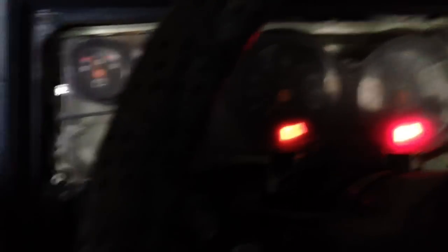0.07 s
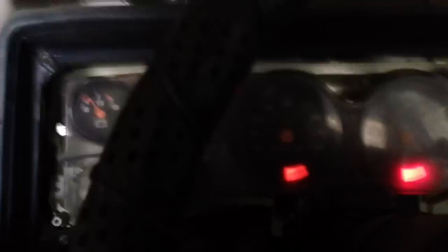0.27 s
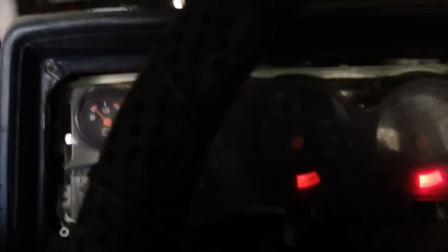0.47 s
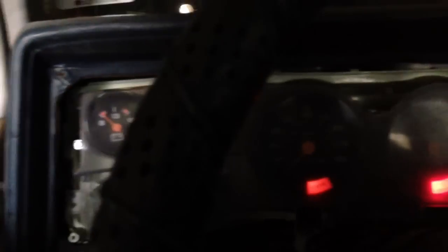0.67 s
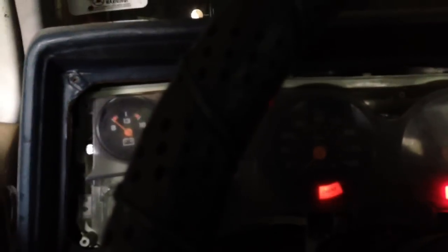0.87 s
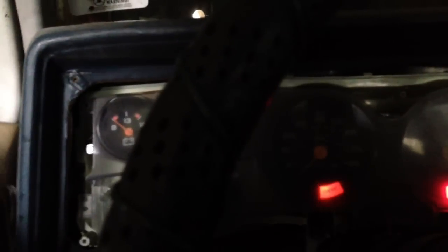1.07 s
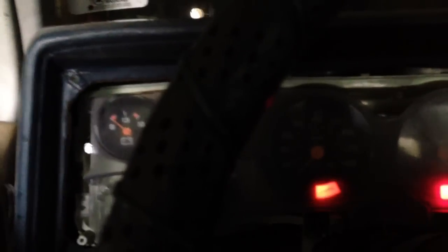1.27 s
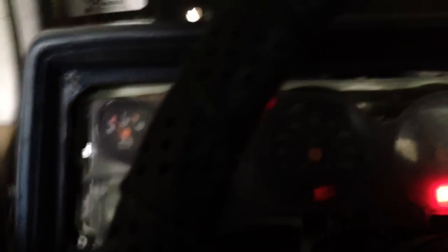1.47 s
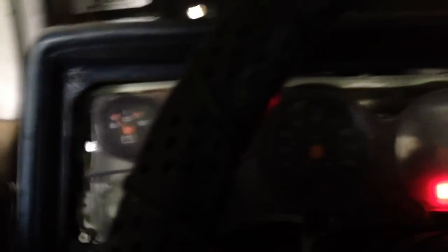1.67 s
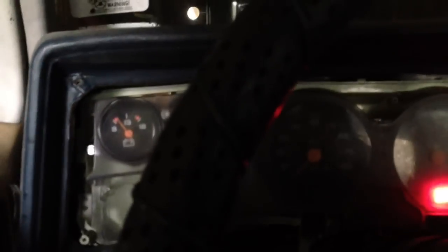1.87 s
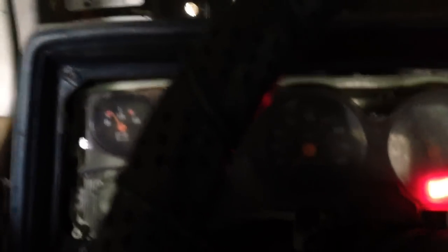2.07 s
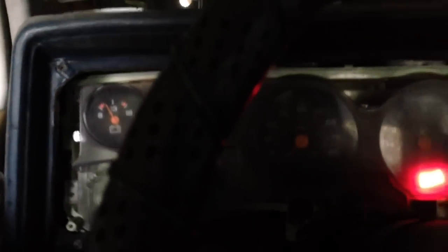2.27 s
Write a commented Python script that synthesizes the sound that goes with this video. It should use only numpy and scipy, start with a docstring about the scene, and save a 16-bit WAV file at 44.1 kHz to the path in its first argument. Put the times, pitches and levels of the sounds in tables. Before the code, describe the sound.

A car starter grinds harshly, heard close from the driver's seat: quick key clicks, over a second of loud metallic gear rasp with a wavering motor growl, then the engine catches, flares with a hoarse belt squeal and fades.

```python
"""The starter motor of a V8 growls and its pinion grinds on the ring gear, heard from the driver's seat.
Teeth clash at random moments and excite the housing; harder bites ring it, and the motor is a wavering tone.
Key clicks come first, a snap and a short ring each. At the end the engine catches, flares and runs down:
firing pulses excite the cabin, with a firing tone, a hiss of intake air and a belt rasp of resonant noise."""
import sys
import numpy as np
from scipy import signal
from scipy.fft import rfft, irfft, next_fast_len
from scipy.io import wavfile
from scipy.ndimage import map_coordinates

SR = 44100
rng = np.random.default_rng(int(sys.argv[2]) if len(sys.argv) > 2 else 0)


def materialize(psi):
    """Save the field psi as 16-bit PCM at rate SR to the path in sys.argv[1].

    A 1-D psi becomes a single channel; in a 2-D psi each row is a channel.
    """
    bounded = np.clip(np.atleast_2d(psi).T, -1, 1)
    quanta = np.round(bounded * 32767).astype(np.int16)
    wavfile.write(sys.argv[1], SR, quanta)


N = 101430

# Steady background noise. Each row: frequency in Hz, level in dB.
FLOOR_SPECTRUM = [(25, -25), (80, -30), (135, 3), (220, -13), (500, -22.5), (3000, -34), (15000, -34)]
FLOOR_DB = -54.5

# Key and switch clicks. Each row: time in seconds, level in dB, level of the snap against the ring in dB.
KEY_CLICKS = [(0.077, -47, -1), (0.098, -32.5, -18), (0.125, -44, 2), (0.1336, -26.5, 4), (0.151, -41, 7)]
# Modes of the lock barrel. Each row: frequency in Hz, width in Hz, level in dB.
LOCK_MODES = [(780, 60, 3.5), (970, 200, -4), (1663, 180, -2), (2120, 470, -6), (4350, 320, -13)]
# Spectrum of the snap. Each row: frequency in Hz, level in dB.
SNAP_SPECTRUM = [(150, -28), (500, -25), (760, 3.5), (2500, -15), (4300, -2), (6500, -14.5), (15000, -14)]
LOCK_T60_S, SNAP_T60_S = 0.075, 0.04  # time to fall by 60 dB
LOCK_DB, SNAP_DB = -3.5, 0.5

# How hard the pinion grinds. Each row: time in seconds, level in dB before the chatter.
GRIND_LEVEL = [(.2, -66), (.214, -40), (.231, -27.5), (.236, -17), (.258, -16.5), (.31, -11), (.345, -13),
               (.41, -13), (.452, -12.5), (.502, -11.5), (.6, -15.5), (.645, -15), (.73, -13), (.815, -18),
               (.888, -12), (.938, -15.5), (.978, -23.5), (.992, -8.5), (1.05, -13.5), (1.07, -18),
               (1.095, -13.5), (1.14, -12.5), (1.175, -17.5), (1.2, -22.5), (1.228, -27.5), (1.26, -23.5),
               (1.304, -29.5), (1.35, -26), (1.361, -12.5), (1.38, -15), (1.434, -22.5), (1.46, -16),
               (1.49, -20), (1.54, -34.5), (1.6, -55)]
# Spectrum of the grinding. Each row: frequency in Hz, level in dB.
GRIND_SPECTRUM = [(59, -36), (118, -32), (173, -9), (313, -9.5), (386, -19), (478, -7), (600, -15),
                  (1460, -9), (1730, -3), (2400, -4.5), (2630, -6.5), (2870, -4), (5750, -6.5),
                  (11300, -22.5), (15500, -34.5)]
# Brightness of the grinding. Each row: time in seconds, treble gain in dB.
GRIND_TREBLE = [(.21, 3.5), (.228, 1.5), (.245, -2.5), (.29, 1), (.35, 0), (.42, -1), (.52, -0.5),
                (.62, -1.5), (.74, 0.5), (.9, 1), (1.02, -2.5), (1.13, -0.5), (1.21, 1), (1.27, 5.5),
                (1.32, -1), (1.37, 3.5), (1.46, 0)]
# Low mids of the grinding. Each row: time in seconds, gain in dB.
GRIND_LOW_MIDS = [(.25, 0), (.41, -9), (.54, -2.5), (.69, -3), (.87, -1), (1.11, -1), (1.24, -0.5)]
# Modes of the starter housing and ring gear. Each row: frequency in Hz, width in Hz, level in dB.
HOUSING_MODES = [(1360, 15, -5), (1739, 35, 3.5), (1913, 30, -5), (2064, 30, 1.5), (2650, 65, -1),
                 (2990, 48, -0.5), (3286, 16, -3), (3790, 16, 5), (4555, 53, -3.5), (4885, 27, 4.5),
                 (5310, 64, -8.5), (5630, 43, 3.5)]
TEETH_PER_S, TOOTH_SCATTER_DB = 900, 3.5  # mean rate of clashes, spread of their strength
SCRAPE_DB, CHATTER_DB = -2.5, 1  # scraping against the clashes, random flicker of the level
SMEAR_S, PATH_S = .0016, .045  # spread of each clash, length of the shifting paths
PATHS_DB, SHIFT_PER_S = -5, 10  # paths against the direct force, knots a second of their change
GRIND_DB, HOUSING_DB = -0.38, -7.5
GRIND_TREBLE_HZ, LOW_MIDS_HZ = 3460, 900

# Starter motor under the changing load. Each row: time in seconds, pitch in Hz, level in dB.
MOTOR_CURVE = [(.22, 230, -51), (.25, 198.6, -35), (.31, 169, -28.5), (.35, 253.7, -40),
               (.41, 219.5, -28.5), (.46, 268, -56), (.53, 250, -28.5), (.57, 175.7, -27.5),
               (.65, 170.8, -29.5), (.685, 182.2, -44), (.735, 205.4, -33), (.76, 213.3, -30.5),
               (.81, 205.9, -38), (.845, 297.7, -47), (.87, 335.3, -24), (.893, 318, -36), (.918, 288, -25),
               (.95, 256, -56), (1.01, 178, -43), (1.06, 202, -67), (1.13, 298, -51), (1.168, 337.4, -33),
               (1.21, 322.7, -44.5), (1.3, 282, -73)]
# Levels of the first harmonics in dB, the fundamental first.
MOTOR_HARMONICS = [0, -43, -14.5]
MOTOR_ROUGH_RAD, MOTOR_FLUTTER = .36, .4  # random phase, random share of the amplitude
MOTOR_CUT_HZ = 140

# Hard bites of the pinion. Each row: time in seconds, level in dB, strongest mode in Hz,
# second mode in Hz, second mode against the first in dB.
BITES = [(0.33, -10, 2614, 1740, -12), (0.992, -9, 2633, 3720, -4), (1.117, -12, 2044, 1767, -4),
         (1.255, -21.5, 5030, 5283, -2), (1.354, -11, 3230, 1770, -8.5), (1.385, -16.5, 2656, 3764, -5)]
BITE_T60_S, OTHER_MODES_DB = 0.24, -5

# The engine catches and runs down. Each row: time in seconds, firings a second, level of the thuds in dB.
ENGINE_CURVE = [(1.2, 39.6, -37), (1.42, 48, -38.5), (1.52, 53.3, -30), (1.65, 59.8, -27),
                (1.73, 69.5, -26), (1.8, 75, -18), (1.85, 82, -15.5), (1.905, 101, -18), (1.93, 91, -21.5),
                (1.97, 80, -23.5), (2, 73.4, -28), (2.1, 81.2, -34), (2.3, 78, -35)]
# Spectrum of the thuds. Each row: frequency in Hz, level in dB.
THUD_SPECTRUM = [(24, -54), (40, -26), (66, -10), (157, 4.5), (340, -19), (400, -2), (812, -5), (1250, -30),
                 (1800, -36), (3960, -100)]
# Air and panel modes of the cabin. Each row: frequency in Hz, width in Hz, level in dB.
CABIN_MODES = [(160.3, 44, -1), (205.5, 31, 1.5), (280, 36, -4), (351, 24, -5.5), (455, 28, -5),
               (574, 46, -13), (915, 17, -9), (1052, 22, -6)]
# Tone at the firing rate. Each row: time in seconds, level in dB.
BOOM_LEVEL = [(1.55, -65), (1.72, -42), (1.81, -22.5), (1.86, -27.5), (1.92, -29), (2.02, -42), (2.12, -45),
              (2.2, -40), (2.3, -38)]
FIRING_SCATTER_DB, FIRING_JITTER_S = 2.2, .0016
PUFF_S, PUFF_DB = .008, -1  # decay constant, level against the kicks
THUD_DB, CABIN_DB = -11.5, -5
BOOM_OCTAVE_DB, BOOM_FLUTTER = -8, .25  # second harmonic, random share of the amplitude

# Intake air and valve clatter. Each row: time in seconds, level in dB before the treble gain.
INTAKE_LEVEL = [(1.45, -54), (1.53, -39), (1.58, -35), (1.71, -34.5), (1.76, -31), (1.88, -26),
                (1.95, -27.5), (2, -33.5), (2.1, -36.5), (2.3, -41)]
# Spectrum of the hiss. Each row: frequency in Hz, level in dB.
INTAKE_SPECTRUM = [(400, -1.5), (600, -2.5), (1000, -3), (1500, -2), (2500, 1), (3500, -4), (5500, -4.5),
                   (8000, -12), (12000, -13.5), (15500, -19)]
# Brightness of the hiss. Each row: time in seconds, treble gain in dB.
INTAKE_TREBLE = [(1.5, 2), (1.6, 6), (1.67, 5), (1.74, 8), (1.86, 3.5), (1.94, -1), (2.02, -11),
                 (2.3, -9.5)]

# Belt squeal. Each row: time in seconds, level of the lower squeal in dB, level of the upper squeal in dB.
BELT_LEVELS = [(1.58, -49, -68), (1.66, -27.5, -54.5), (1.73, -45, -58), (1.76, -35, -35), (1.79, -22, -30),
               (1.835, -27.5, -34), (1.86, -34, -23), (1.89, -26, -20), (1.92, -33, -26),
               (1.96, -33, -25.5), (2, -54, -38), (2.15, -59, -55)]
# Lower belt resonances. Each row: frequency in Hz, width in Hz, level in dB.
BELT_LOW_MODES = [(2258, 58, 2), (2580, 170, -13), (1960, 77, -6)]
# Upper belt resonances. Each row: frequency in Hz, width in Hz, level in dB.
BELT_HIGH_MODES = [(2720, 59, -5), (2500, 110, -9), (2794, 76, 11)]
SLIPS_PER_S, SLIP_SCATTER_DB = 420, 2  # knots a second of the random level, its spread

LOW_CUT_HZ, TOP_HZ = 53, 15600


def amp(db):
    """Decibel law: the amplitude gain of a level in dB."""
    return 10 ** (np.asarray(db) / 20)


def unit(x):
    """Normalisation: x at rms 1."""
    return x / np.sqrt(np.mean(x ** 2) + 1e-20)


def clock():
    """Sampling: the time of each sample in seconds."""
    return np.arange(N) / SR


def curves(rows):
    """Linear interpolation: one value per sample for each column after the time."""
    times, *columns = np.transpose(rows)
    return [np.interp(clock(), times, column) for column in columns]


def wobble(rate):
    """Band-limited randomness: a smooth curve through random knots, rate of them a second."""
    return map_coordinates(rng.standard_normal(N // 8), [clock() * rate], mode="wrap")


def noise():
    """White noise: equal mean power at every frequency."""
    return rng.standard_normal(N)


def pulses(times, sizes):
    """Impulse excitation: single-sample kicks; those past the end are dropped."""
    samples = np.clip(times * SR, 0, N).astype(int)
    return np.bincount(samples, sizes, N + 1)[:N]


def filtered(x, response):
    """Linear filtering: the spectrum of x times a response of frequency."""
    size = next_fast_len(N + SR // 2)
    return irfft(rfft(x, size) * response(np.fft.rfftfreq(size, 1 / SR)), size)[:N]


def coloured(x, points):
    """Spectral shaping: x through a (Hz, dB) curve, at rms 1."""
    f, db = np.transpose(points)
    return unit(filtered(x, lambda hz: amp(np.interp(np.log(hz + 1), np.log(f), db))))


def resonate(x, modes):
    """Modal superposition: x through damped resonances of alternating sign, at rms 1."""
    def response(f):
        total = 0
        for k, (centre, width, db) in enumerate(modes):
            resonance = 1j * f * width / (centre * centre - f * f + 1j * f * width)
            total = total + (-1) ** k * amp(db) * resonance
        return total
    return unit(filtered(x, response))


def shelved(x, corner_hz, db):
    """Shelving: the treble of x is raised by db."""
    treble = filtered(x, lambda hz: hz ** 2 / (hz ** 2 + corner_hz ** 2))
    return x + (amp(db) - 1) * treble


def smeared(x, length_s):
    """Phase dispersion: x is spread over a short time, its magnitude spectrum unchanged."""
    burst = noise()[:int(length_s * SR)]
    return filtered(x, lambda hz: np.exp(1j * np.angle(rfft(burst, 2 * len(hz) - 2))))


def blow(start, t60, attack):
    """Exponential decay: the envelope of a blow with a short rise."""
    t = np.maximum(clock() - start, 0)
    return (1 - np.exp(-t / attack)) * np.exp(-np.log(1000) * t / t60)


def background():
    """Stationary noise: a steady floor of fixed spectrum."""
    return amp(FLOOR_DB) * coloured(noise(), FLOOR_SPECTRUM)


def key():
    """Impact and free vibration: each click is a snap and a short ring of the lock barrel."""
    out = np.zeros(N)
    for start, db, bright_db in KEY_CLICKS:
        ring = np.zeros(N)
        for hz, width, level in LOCK_MODES:
            # random phase broadens each mode
            ring += amp(level) * np.sin(2 * np.pi * hz * (clock() - start) + 1.24 * wobble(2 * width))
        ring = amp(LOCK_DB) * unit(ring) * blow(start, LOCK_T60_S, 0.00059)
        snap = coloured(noise(), SNAP_SPECTRUM) * blow(start, SNAP_T60_S, 0.00044)
        out += amp(db) * (ring + amp(SNAP_DB + bright_db) * snap)
    return out


def tooth_force():
    """Random impulse train: teeth clash at uneven moments and scrape between, smeared by the metal."""
    draws = rng.standard_normal((6000, 3))
    gaps = np.abs(draws[:, 0]) * np.sqrt(np.pi / 2)  # mean 1
    times = np.cumsum(gaps) / TEETH_PER_S
    sizes = np.sign(draws[:, 1]) * amp(TOOTH_SCATTER_DB * np.clip(draws[:, 2], -2, 1))
    clashes = unit(pulses(times, sizes))
    return smeared(unit(clashes + amp(SCRAPE_DB) * noise()), SMEAR_S)


def shifting_paths(force):
    """Multipath transmission: eight diffuse paths whose shares shift as the gear turns."""
    fade = np.linspace(1, 0, int(PATH_S * SR)) ** 2
    shares = np.array([wobble(SHIFT_PER_S) for _ in range(8)])
    shares = shares / np.linalg.norm(shares, axis=0)  # constant total power
    out = np.zeros(N)
    for share in shares:
        echoes = noise()[:len(fade)] * fade
        out += share * signal.fftconvolve(force, echoes)[:N]
    return unit(out)


def grinding():
    """Forced vibration: the clashing teeth give a dense rasp and excite the housing modes."""
    force = tooth_force()
    rasp = coloured(force + amp(PATHS_DB) * shifting_paths(force), GRIND_SPECTRUM)
    grind = amp(GRIND_DB) * rasp + amp(HOUSING_DB) * resonate(force, HOUSING_MODES)
    low_mids = filtered(grind, lambda hz: 1 / (1 + (hz / LOW_MIDS_HZ) ** 4))
    grind = grind + (amp(curves(GRIND_LOW_MIDS)[0]) - 1) * low_mids
    level = amp(curves(GRIND_LEVEL)[0] + CHATTER_DB * wobble(150))
    return level * shelved(grind, GRIND_TREBLE_HZ, curves(GRIND_TREBLE)[0])


def motor():
    """Harmonic series under load: the starter's rough growl sags on each compression."""
    hz, db = curves(MOTOR_CURVE)
    phase = 2 * np.pi * np.cumsum(hz) / SR + MOTOR_ROUGH_RAD * wobble(110)
    tone = unit(sum(amp(level) * np.sin(k * phase) for k, level in enumerate(MOTOR_HARMONICS, 1)))
    started = clock() > MOTOR_CURVE[0][0]
    growl = amp(db) * tone * (1 + MOTOR_FLUTTER * wobble(140)) * started
    return filtered(growl, lambda f: 1 - 1 / (1 + (f / MOTOR_CUT_HZ) ** 10))


def housing_mode(hz):
    """Modal vibration: a sine of random starting phase, slightly unsteady."""
    return np.sin(2 * np.pi * (hz * clock() + rng.random()) + .5 * wobble(69.3))


def bites():
    """Impact response: the pinion slams into the ring gear and the housing rings, two modes above the rest."""
    out = np.zeros(N)
    for start, db, first_hz, second_hz, second_db in BITES:
        rest = unit(sum(amp(level) * housing_mode(hz) for hz, _, level in HOUSING_MODES))
        ring = housing_mode(first_hz) + amp(second_db) * housing_mode(second_hz)
        ring = unit(ring + amp(OTHER_MODES_DB) * rest)
        out += amp(db) * ring * blow(start, BITE_T60_S, .003)
    return out


def engine():
    """Pulse excitation: uneven firings thud through the cabin and pulse the intake air and slipping belt."""
    rate, db = curves(ENGINE_CURVE)
    turns = np.cumsum(rate) / SR  # firings so far
    times = np.interp(np.arange(1, int(turns[-1])), turns, clock())
    draws = rng.standard_normal((len(times), 2))
    times = times + FIRING_JITTER_S * np.clip(draws[:, 0], -1, 1)
    kicks = pulses(times, amp(FIRING_SCATTER_DB * np.clip(draws[:, 1], -2, 1)))
    gate = unit(signal.lfilter([1], [1, -np.exp(-1 / (PUFF_S * SR))], kicks))
    puffs = unit(gate * noise())
    thuds = amp(THUD_DB) * coloured(kicks, THUD_SPECTRUM)
    cabin = amp(CABIN_DB) * resonate(unit(kicks) + amp(PUFF_DB) * puffs, CABIN_MODES)
    # the added constants make the pulsing of air and belt shallower
    air_and_belt = intake(unit(gate + 3.6)) + belt(unit(gate + 4.0))
    running = np.clip((clock() - ENGINE_CURVE[0][0]) * 10, 0, 1)  # fades in over 0.1 s
    return running * (amp(db) * (thuds + cabin) + boom(turns) + air_and_belt)


def boom(turns):
    """Periodic excitation: a fluttering tone at the firing rate and its octave."""
    phase = 2 * np.pi * turns + 0.12 * wobble(36.7)
    tone = unit(np.sin(phase) + amp(BOOM_OCTAVE_DB) * np.sin(2 * phase))
    return amp(curves(BOOM_LEVEL)[0]) * tone * (1 + BOOM_FLUTTER * wobble(50))


def intake(gate):
    """Turbulent flow noise: a pulsing hiss that dulls as the engine runs down."""
    hiss = coloured(gate * noise(), INTAKE_SPECTRUM)
    return amp(curves(INTAKE_LEVEL)[0]) * shelved(hiss, 4800, curves(INTAKE_TREBLE)[0])


def squeal(modes):
    """Limited friction vibration: resonant noise held at an even strength, in a band round 2500 Hz."""
    x = resonate(noise(), modes)
    held = x / (np.abs(signal.hilbert(x)) + .5)
    return unit(filtered(held, lambda hz: 1 / (1 + np.abs((hz - 2500) / 750) ** 4)))


def belt(gate):
    """Slipping friction: a hoarse squeal passes from a lower to a higher resonance as the engine flares."""
    low_db, high_db = curves(BELT_LEVELS)
    slips = unit(amp(SLIP_SCATTER_DB * wobble(SLIPS_PER_S)))
    return gate * slips * (amp(low_db) * squeal(BELT_LOW_MODES) + amp(high_db) * squeal(BELT_HIGH_MODES))


def scene():
    """Superposition: the sum of all sources as heard in the cabin."""
    return (background() + key() + grinding() + motor() + bites() + engine())[None]


def record(dry):
    """Saturation and band limiting: rounds the highest peaks, thins the deep bass, cuts the extreme treble."""
    x = dry[0] / (1 + np.abs(dry[0]) ** 10) ** (1 / 10)
    x = signal.sosfilt(signal.butter(4, LOW_CUT_HZ, "high", fs=SR, output="sos"), x)
    return filtered(x, lambda hz: hz < TOP_HZ)[None]


dry = scene()
out = record(dry)
materialize(out)
```